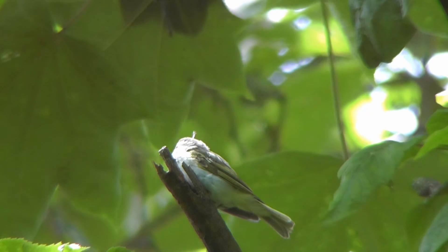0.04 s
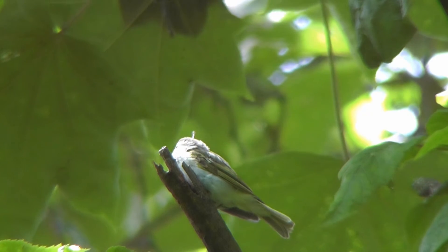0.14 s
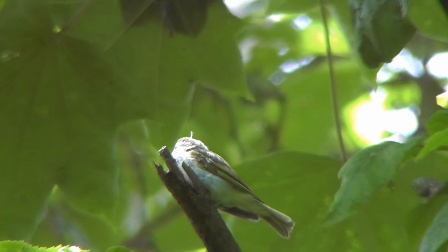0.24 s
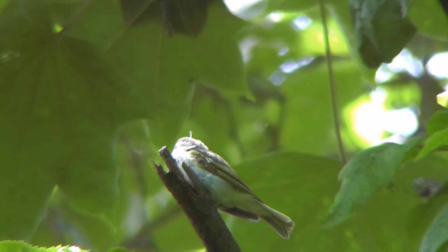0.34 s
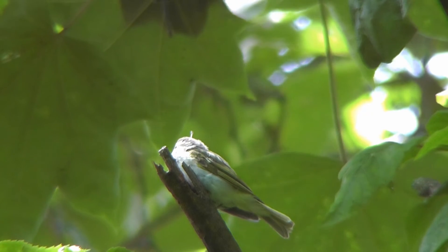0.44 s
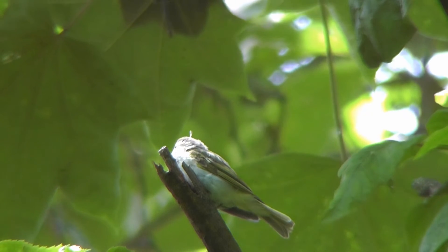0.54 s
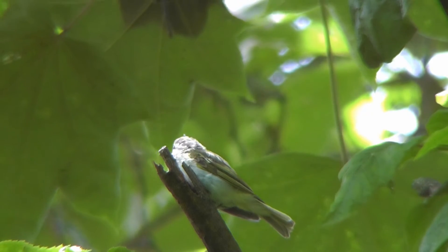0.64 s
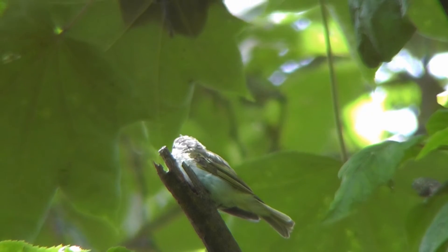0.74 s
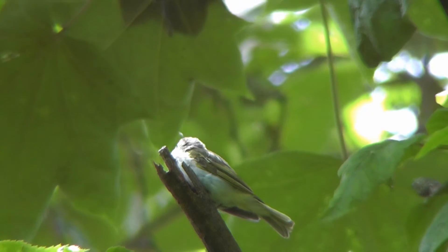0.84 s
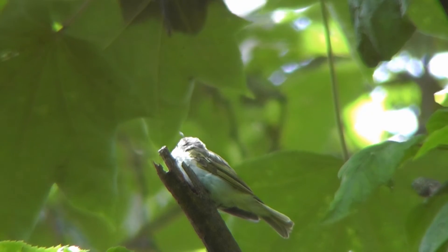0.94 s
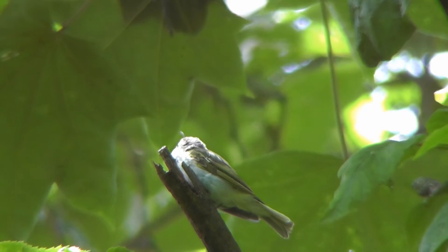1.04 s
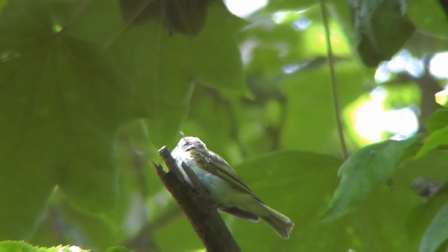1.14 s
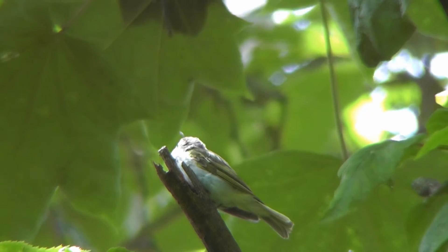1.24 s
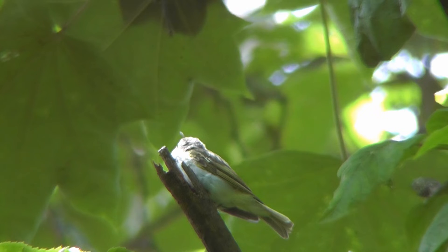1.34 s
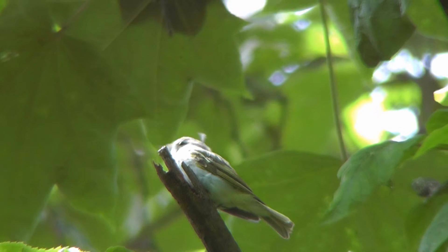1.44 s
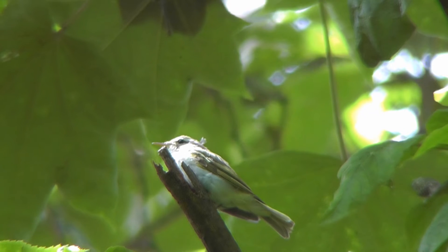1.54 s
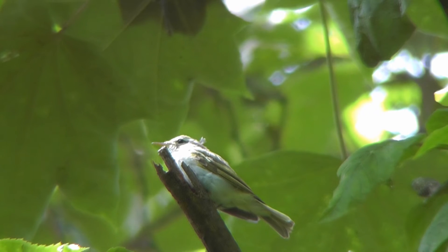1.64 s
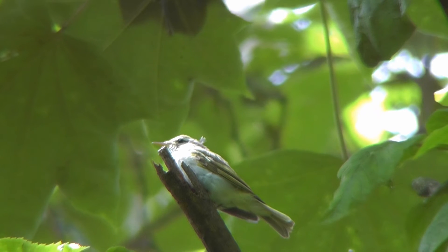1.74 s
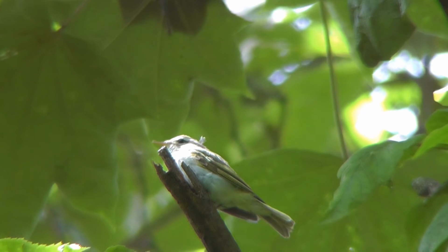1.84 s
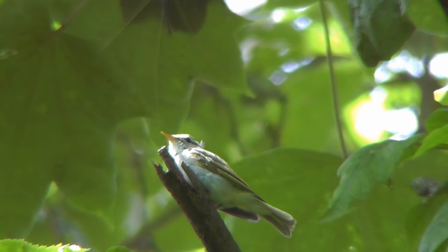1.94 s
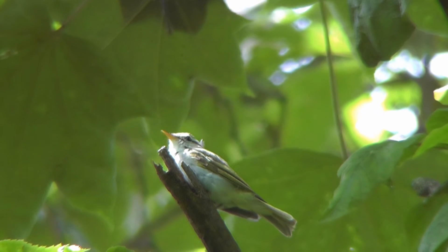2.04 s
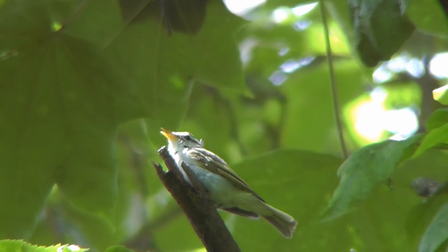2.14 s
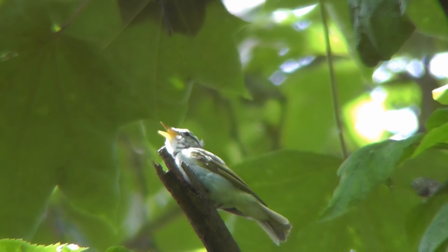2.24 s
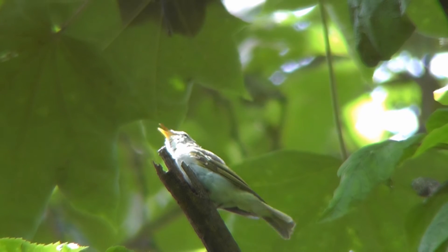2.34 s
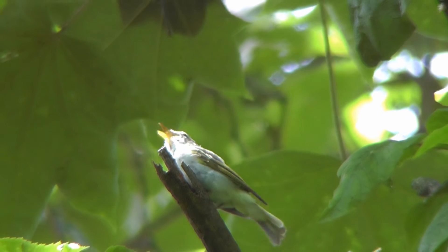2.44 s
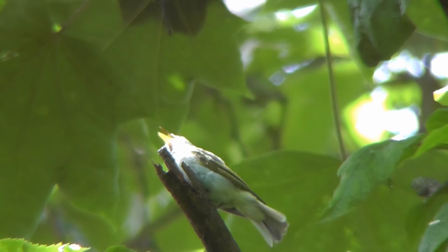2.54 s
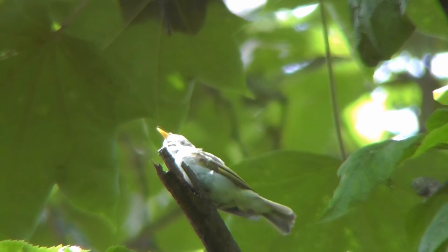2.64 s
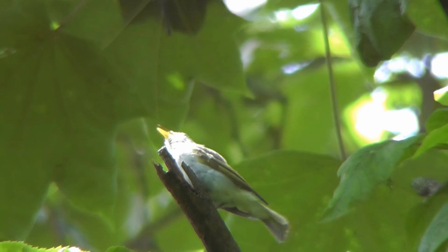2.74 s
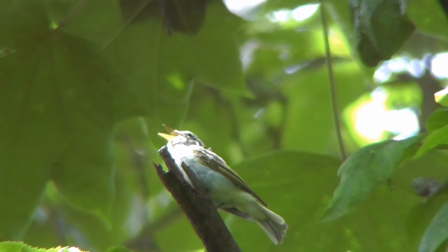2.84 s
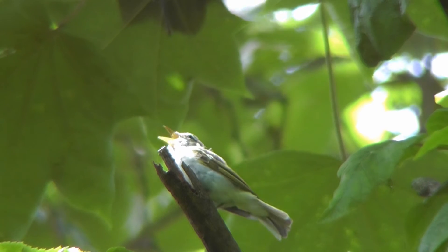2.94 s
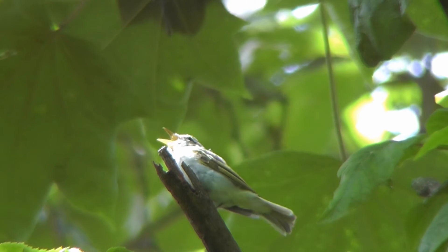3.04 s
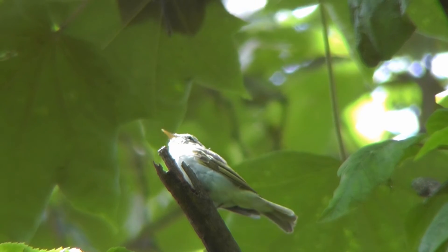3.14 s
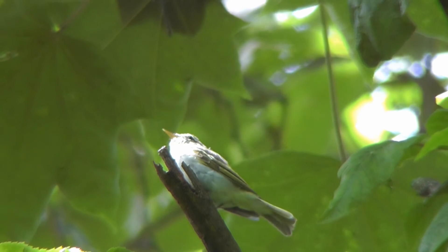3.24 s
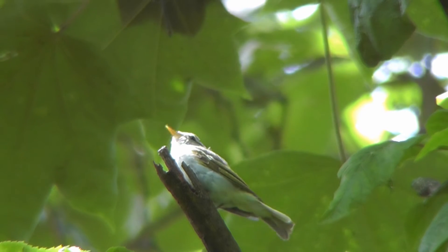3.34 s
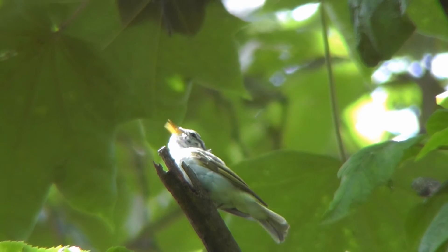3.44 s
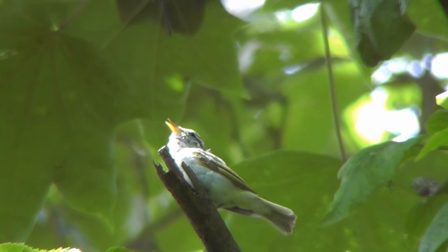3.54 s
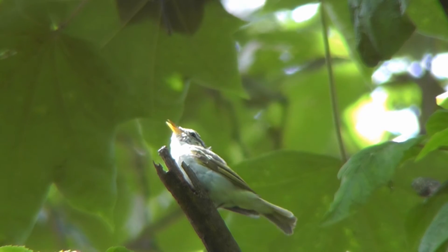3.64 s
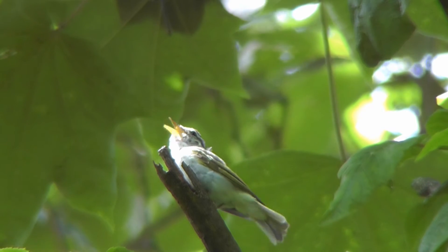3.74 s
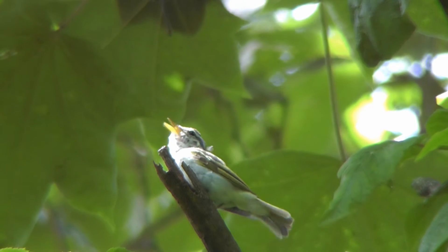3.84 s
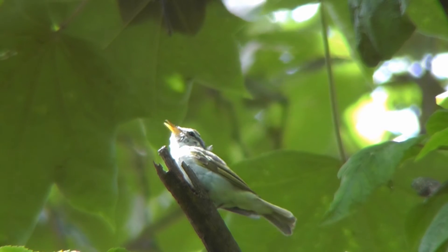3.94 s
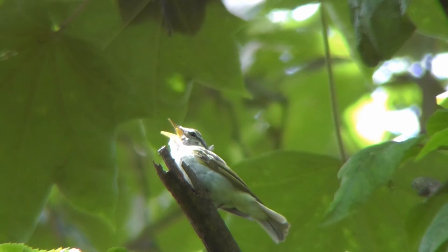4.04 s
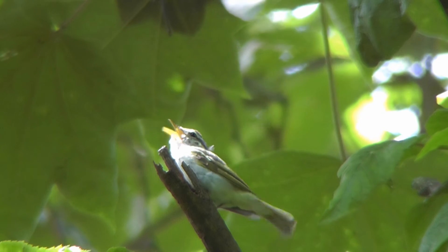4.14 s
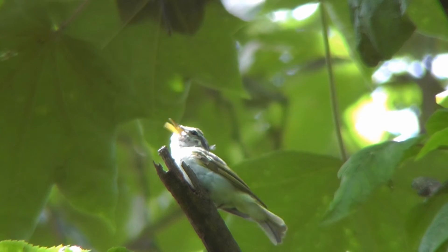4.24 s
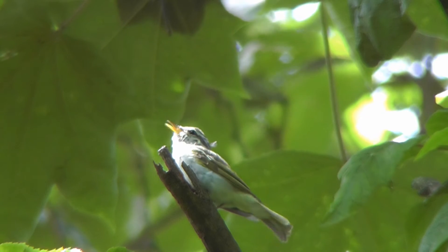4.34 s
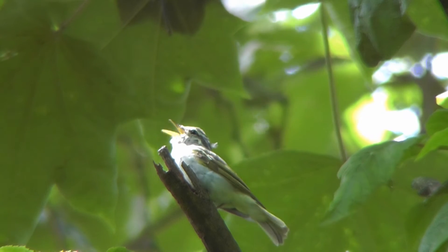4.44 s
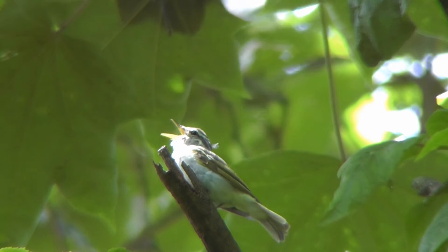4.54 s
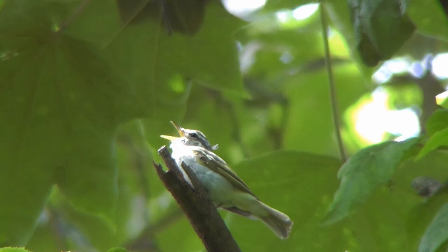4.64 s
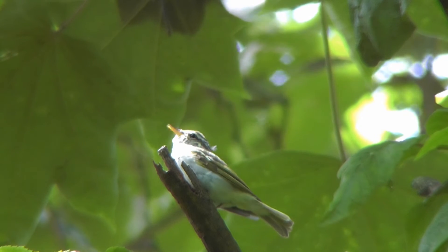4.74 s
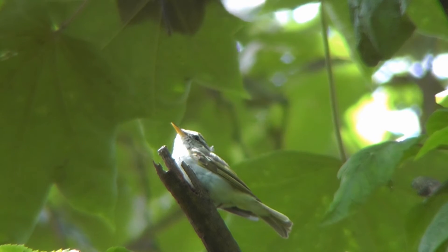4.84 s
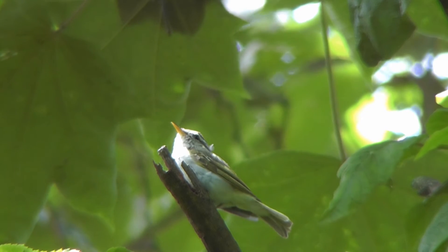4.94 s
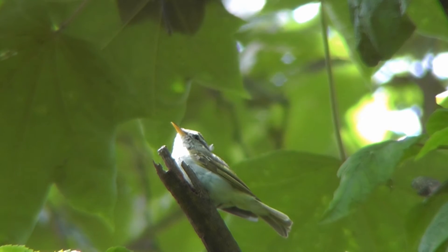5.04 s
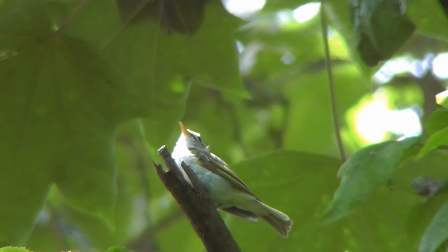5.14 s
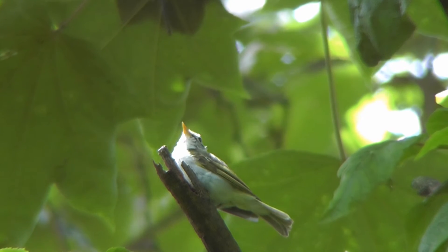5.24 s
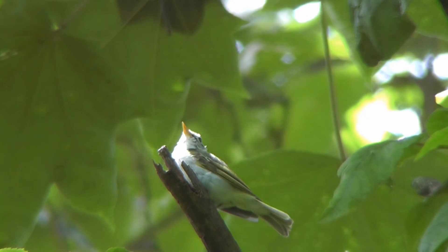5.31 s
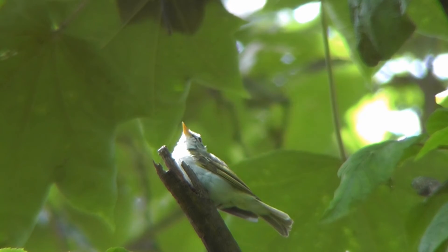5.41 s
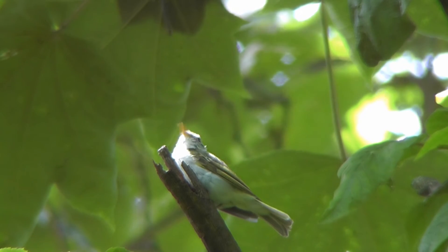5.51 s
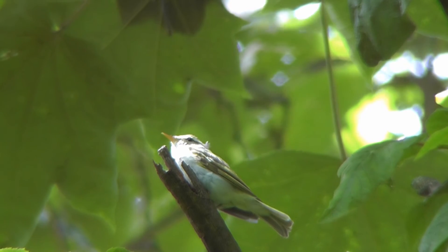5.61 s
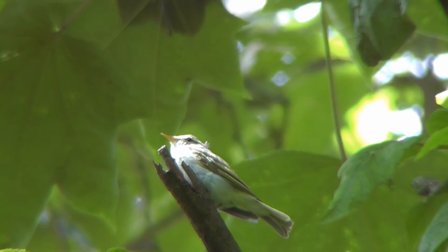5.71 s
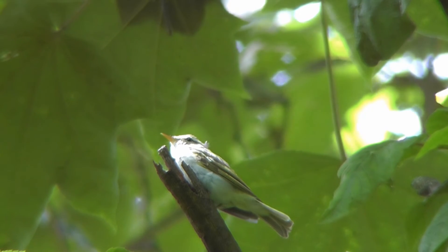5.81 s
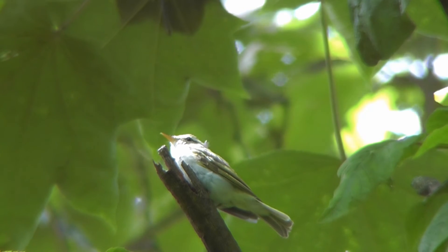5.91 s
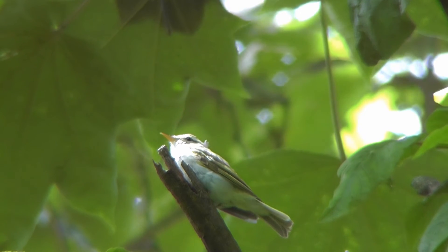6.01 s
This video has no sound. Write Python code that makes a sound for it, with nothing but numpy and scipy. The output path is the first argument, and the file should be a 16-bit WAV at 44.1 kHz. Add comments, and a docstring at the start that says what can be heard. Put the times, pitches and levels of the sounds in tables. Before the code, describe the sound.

A leafy wood, softly hissing. Tiny birds chip and glide high in the distance; four or five quick papery wing-like strokes sound close. Then one small bird dominates, nearly centred and fairly close: sharp arched whistles and a rising buzzy trill, a slight pause, more swooping whistles and a second buzz. A weak caw hides behind it. The song echoes away into hush, light leaf brushing and dry little creaking ticks.

```python
"""A leaf warbler sings from a stump in a wood: quick slurred whistles in two runs, each ending in a rising buzz.
The song is a nearly pure tone with fast-moving pitch, scattered by leaves and trunks. Deeper in the wood, small
birds give thin gliding tones and a far crow caws once in harmonics. Near the microphone, strokes of noise make
a short flutter and leaf rustles, and ringing modes make creaking ticks. Shaped noise is the hush of the trees."""
import sys
import numpy as np
from scipy import signal
from scipy.fft import rfft, irfft, next_fast_len
from scipy.io import wavfile
from scipy.ndimage import uniform_filter1d

SR = 44100
rng = np.random.default_rng(int(sys.argv[2]) if len(sys.argv) > 2 else 0)


def wav_record(signal):
    """Record a signal, one row per channel, as 16-bit PCM in the file named by sys.argv[1]."""
    frames = np.transpose(np.atleast_2d(signal))
    bounded = np.clip(frames, -1, 1)
    # unit amplitude maps onto the largest positive 16-bit level
    quanta = np.round(bounded * 32767).astype(np.int16)
    wavfile.write(sys.argv[1], SR, quanta)


N = 267687
T = np.arange(N) / SR   # time in s


def from_db(db):
    """Decibels to gain."""
    return 10 ** (np.asarray(db) / 20)


def rms_one(x):
    """Scale to unit rms."""
    return x / np.sqrt(np.mean(x ** 2) + 1e-20)


def in_time(rows, t):
    """The columns of a curve at times t."""
    s, *columns = np.transpose(rows)
    return [np.interp(t, np.sort(s), column) for column in columns]


def gain_at(spectrum, hz):
    """Gain of a spectrum on a log-frequency axis; past its ends it falls 60 dB per octave."""
    f, db = np.transpose(spectrum)
    inside = np.clip(hz, f[0], f[-1])
    octaves_outside = np.abs(np.log2((hz + 1) / inside))
    return from_db(np.interp(np.log(inside), np.log(f), db) - 60 * octaves_outside)


def noise(spectrum):
    """Random noise coloured by a spectrum, rms 1."""
    size = next_fast_len(N)
    bins_hz = np.arange(size // 2 + 1) * SR / size
    white = rfft(rng.standard_normal(size))
    return rms_one(irfft(white * gain_at(spectrum, bins_hz), size)[:N])


def drift(t, rate):
    """Random values, rate of them a second, joined by straight lines; spread near 1."""
    knots = np.arange(0, N / SR + 1, 1 / rate)
    return np.interp(t, knots, rng.standard_normal(len(knots)))


def turn(hz):
    """Running phase of an oscillator."""
    return 2 * np.pi * np.cumsum(hz) / SR


def stretch(start, length):
    """The samples of a sound and the time since its start."""
    span = (T > start) & (T < start + length)
    return span, T[span] - start


def gate(t, length, attack_s, release_s):
    """Smooth attack, hold, smooth release."""
    ramp = np.minimum(t / attack_s, (length - t) / release_s)
    return np.sin(np.pi / 2 * np.clip(ramp, 0, 1)) ** 2


def swells(rows):
    """Envelope of bell-shaped strokes: (centre_s, level_db, half_length_s)."""
    envelope = 0
    for s, db, half in rows:
        envelope = envelope + from_db(db) * np.exp(-.5 * np.minimum(((T - s) / half) ** 2, 100))
    return envelope


def wood(x, leaves_db, leaves_t60, trunks_db, trunks_t60):
    """Direct sound, a quick spray of echoes off nearby leaves, and a longer wash from the trunks."""
    t = T[:SR]
    # about 1500 leaf echoes a second, none in the first 2 ms
    sparse = rng.standard_normal(SR) * (rng.random(SR) < 1500 / SR) * (t > .002)
    leaves = sparse * from_db(-60 * t / leaves_t60)
    trunks = rng.standard_normal(SR) * (1 - np.exp(-t / .014)) * from_db(-60 * t / trunks_t60)
    echoes = (from_db(leaves_db) * rms_one(leaves) + from_db(trunks_db) * rms_one(trunks)) / np.sqrt(SR)
    return x + signal.fftconvolve(x, echoes)[:N]


def syrinx(hz, overtone_db=-44):
    """The warbler's almost pure tone; a trace of its octave gets through on the lower pitches."""
    phase = turn(hz)
    passes = 1 / (1 + (hz / 4450) ** 20)
    return np.sqrt(2) * (np.sin(phase) + from_db(overtone_db) * passes * np.sin(2 * phase))


RELEASE_S = .012   # of every whistle and buzz
WHISTLE_ATTACK_S, WHISTLE_WAVER = .022, .004   # waver as a fraction of the pitch
SWELL_DB_PER_S = 78.5   # a note grows louder up to its crest
SWEEP_LOSS_DB, FAST_SWEEP_HZ_PER_S = 4.5, 120000   # the tone weakens while the pitch moves fast
# level of a whistle by its pitch: pitch_hz, level_db
THROAT = [(2600, -14), (2850, -12), (3100, -3), (3400, -1.5), (4250, 0), (4950, -1), (5350, -2.5),
          (6100, 0), (7100, -4), (7900, -14)]


def whistle(crest_s, lead_s, out_s, db, pitch):
    """One slurred tone; pitch gives Hz by time from the crest, and level follows the pitch and its speed."""
    out = np.zeros(N)
    length = lead_s + out_s
    span, t = stretch(crest_s - lead_s, length)
    hz = uniform_filter1d(pitch(t - lead_s), size=180, mode="nearest")   # rounds the corners over 4 ms
    sweep = np.abs(np.gradient(hz)) * SR / FAST_SWEEP_HZ_PER_S
    level_db = db + SWELL_DB_PER_S * np.minimum(t - lead_s, 0) - SWEEP_LOSS_DB * sweep
    level = from_db(level_db) * gain_at(THROAT, hz) * gate(t, length, WHISTLE_ATTACK_S, RELEASE_S)
    out[span] = level * syrinx(hz * (1 + WHISTLE_WAVER * drift(t, rate=330)))
    return out


HOOK_RISE_S, HOOK_FALL_S = .016, .018   # width of the arch before and after its crest


def hook_pitch(opening_hz, crest_hz, closing_hz):
    """A round arch between two held pitches."""
    def pitch(t):
        rise = opening_hz + (crest_hz - opening_hz) * np.exp(-(t / HOOK_RISE_S) ** 2)
        fall = closing_hz + (crest_hz - closing_hz) * np.exp(-(t / HOOK_FALL_S) ** 2)
        return np.where(t < 0, rise, fall)
    return pitch


# the warbler's short arched notes, levels before the throat's colour:
# crest_s, lead_in_s, run_out_s, opening_hz, crest_hz, closing_hz, level_db
HOOKS = [(2.4544, .019, 0.046, 4040, 5054, 4233, -23), (3.001, .024, 0.043, 4520, 4965, 4000, -22),
         (3.647, 0.038, 0.042, 3110, 4407, 2740, -21.5), (3.98, 0.038, 0.045, 3080, 4404, 2668, -20.5)]


def hooks():
    """Short whistles whose pitch arches up and over."""
    return sum(whistle(s, lead, out, db, hook_pitch(*shape)) for s, lead, out, *shape, db in HOOKS)


def slur_pitch(opening_hz, crest_hz, floor_hz, climb_s, sink_s):
    """An ever steeper climb, then a fall that flattens out."""
    def pitch(t):
        climb = opening_hz + (crest_hz - opening_hz) * np.exp(-np.abs(t) / climb_s)
        sink = floor_hz + (crest_hz - floor_hz) / (1 + (t / sink_s) ** 2)
        return np.where(t < 0, climb, sink)
    return pitch


# the warbler's longer notes, climbing to a crest and sinking towards a floor, levels before the throat's colour:
# crest_s, lead_in_s, run_out_s, opening_hz, crest_hz, floor_hz, climb_s, sink_halfway_s, level_db
SLURS = [(2.505, 0.016, 0.027, 4010, 8010, 6610, 0.01, 0.011, -20.5),
         (2.7527, .087, 0.13, 5850, 6300, 3388, .0165, 0.023, -23.5),
         (3.7168, 0.046, 0.079, 3770, 5208, 3298, .029, .015, -22),
         (4.055, 0.048, 0.079, 3647, 5060, 3227, .035, .015, -21.5),
         (4.286, 0.051, 0.0854, 4967, 7100, 5194, 0.0042, 0.013, -23.5),
         (4.433, .018, 0.0846, 5550, 5570, 2404, 0.023, .04, -22.5)]


def slurs():
    """Longer whistles that climb to a crest and sink away."""
    return sum(whistle(s, lead, out, db, slur_pitch(*shape)) for s, lead, out, *shape, db in SLURS)


BUZZ_PER_S, BUZZ_UNEVENNESS = 173, .02   # swings of pitch, and the random fraction of that rate
BUZZ_CREST_HZ, BUZZ_OPENING_HZ, BUZZ_OPEN_S = 7700, 4600, .092   # the crests climb quickly, then level off
BUZZ_TROUGH_BEND = 1.3   # above 1 the troughs climb late
BUZZ_SAG_HZ = 550   # the pitch sags as the buzz dies
BUZZ_ATTACK_S, BUZZ_RELEASE_S, BUZZ_FADE_DB = .038, .1, 19
BUZZ_SWELL_DB, BUZZ_WOBBLE_DB = 6.5, 2.2   # growth in level over the length, and random unevenness
# the warbler's closing buzzes, levels before the swell and fade:
# start_s, length_s, first_trough_hz, last_trough_hz, level_db
BUZZES = [(3.02, .303, 3855, 6240, -29.6), (4.624, .314, 4000, 6640, -30.8)]


def buzzes(first_dip_db=11, last_dip_db=-1, dwell=1.3, rise_dip_db=5.7, sweep_dip_db=3):
    """The tone dwells at its trough and flicks up to a crest, too fast to follow, with uneven swings."""
    out = np.zeros(N)
    for start, length, first_hz, last_hz, db in BUZZES:
        span, t = stretch(start, length)
        along = t / length
        dying = np.maximum(1 - (length - t) / BUZZ_RELEASE_S, 0)
        trough_hz = first_hz + (last_hz - first_hz) * along ** BUZZ_TROUGH_BEND
        crest_hz = BUZZ_CREST_HZ + (BUZZ_OPENING_HZ - BUZZ_CREST_HZ) * np.exp(-t / BUZZ_OPEN_S)
        cycle = turn(BUZZ_PER_S * (1 + BUZZ_UNEVENNESS * drift(t, rate=73)))
        lift = (.5 + .5 * np.sin(cycle)) ** dwell
        hz = trough_hz + (crest_hz - trough_hz) * lift - BUZZ_SAG_HZ * dying
        # the crests start faint and fill out; the tone is weak on the way up and stronger on the way down
        crest_dip_db = first_dip_db + (last_dip_db - first_dip_db) * along
        swing_db = -crest_dip_db * (lift - .5) - rise_dip_db * np.cos(cycle) - sweep_dip_db * np.cos(cycle) ** 2
        level_db = db + BUZZ_SWELL_DB * (along - .5) - BUZZ_FADE_DB * dying
        level_db = level_db + BUZZ_WOBBLE_DB * drift(t, rate=140)
        out[span] += gate(t, length, BUZZ_ATTACK_S, RELEASE_S) * from_db(level_db + swing_db) * syrinx(hz)
    return out


# hard strokes of the flutter: centre_s, level_db, half_length_s
FLUTTER = [(1.575, -37, 0.0027), (1.626, -38, 0.0041), (1.684, -35.5, 0.0019), (1.725, -37.5, 0.0045),
           (1.761, -51, .005)]
# colour of the flutter: frequency_hz, relative level_db
FLUTTER_COLOUR = [(300, -43), (580, 5), (800, -18), (1100, -4), (1600, -6), (2200, 10), (2700, 2),
                  (3400, 2.5), (5000, -12), (5700, -17), (7600, -9.5), (10000, -34), (15000, -36)]
BRUSH_LEAD_S, BRUSH_HALF_S, BRUSH_DB = .011, .0066, -7.5   # lead and level relative to the stroke that follows


def flutter():
    """A quick run of noise strokes, a soft brush before each."""
    brushes = swells([(s - BRUSH_LEAD_S, db + BRUSH_DB, BRUSH_HALF_S) for s, db, _ in FLUTTER])
    return np.hypot(swells(FLUTTER), brushes) * noise(FLUTTER_COLOUR)


# creaking ticks close to the microphone: start_s, relative level_db
TICKS = [(5.5772, -31), (5.5944, -36.5), (5.6441, -27), (5.6534, -30), (5.6604, -27.5), (5.697, -29),
         (5.7114, -37), (5.7204, -37), (5.7369, -37), (5.7474, -42), (5.7543, -33.5)]
# ringing modes of a tick, before random spread: frequency_hz, relative level_db, t60_s
TICK_MODES = [(567, -0.5, 0.014), (1166, -3, 0.049), (1314, -7, 0.017), (2850, -11.5, 0.016),
              (3450, -17, 0.016)]


def ticks(level_db=-1.0, detune=.02, spread_db=3.0, thin_hz=850, soft_hz=4500):
    """Each slip sets the same few short modes ringing; the body is small and the contact soft."""
    out, t = np.zeros(N), T[:SR // 10]
    for s, db in TICKS:
        at = round(s * SR)
        for hz, mode_db, t60 in TICK_MODES:
            start_db = level_db + db + mode_db + spread_db * rng.normal()
            ring_hz = hz * (1 + detune * rng.normal())
            out[at:at + len(t)] += from_db(start_db - 60 * t / t60) * np.sin(2 * np.pi * ring_hz * t)
    band = signal.butter(3, [thin_hz, soft_hz], "band", fs=SR, output="sos")
    return signal.sosfilt(band, out)


# soft rustles of leaves: centre_s, level_db
RUSTLES = [(.03, -54.5), (5.24, -57), (5.315, -53.5), (5.39, -54.5), (5.46, -54.5), (5.53, -54.5),
           (5.569, -52), (5.93, -56), (6.045, -54)]
# colour of the rustles: frequency_hz, relative level_db
RUSTLE_COLOUR = [(800, -35), (2000, 4.5), (3700, 4.5), (5500, -7), (7500, -7), (10000, -43), (15000, -28.5)]


def rustles(half_length_s=.018):
    """Leaves brush softly: bell-shaped puffs of coloured noise."""
    return swells([(s, db, half_length_s) for s, db in RUSTLES]) * noise(RUSTLE_COLOUR)


def thin_call(start, length, db, pitch, waver=.009):
    """A small bird's faint slur that swells and fades; pitch gives Hz by time from its start."""
    out = np.zeros(N)
    span, t = stretch(start, length)
    swell = np.sqrt(np.abs(np.sin(np.pi * t / length)))
    hz = pitch(t) * (1 + waver * drift(t, rate=97))
    out[span] = from_db(db) * swell * np.sin(turn(hz))
    return out


SLIDE_FROM_HZ, SLIDE_TO_HZ = 8780, 7180
# long high slides deeper in the wood: start_s, length_s, level_db
SLIDES = [(0.444, 0.52, -70.5), (1.851, 0.39, -64), (4.466, .31, -58.5), (5.674, 0.54, -70)]


def slides():
    """Thin calls whose pitch falls in a straight line."""
    out = np.zeros(N)
    for s, length, db in SLIDES:
        out += thin_call(s, length, db, lambda t: SLIDE_FROM_HZ + (SLIDE_TO_HZ - SLIDE_FROM_HZ) * t / length)
    return out


# lower calls deeper in the wood: start_s, length_s, final_hz, settling_s, level_db
DROPS = [(.628, .19, 4750, .085, -68.5), (.925, 0.12, 5460, .11, -75), (1.089, 0.25, 4904, .04, -64),
         (1.776, .3, 5050, .046, -64.5), (2.326, .16, 4700, 0.12, -68), (3.514, .17, 4810, .08, -60.5),
         (4.207, 0.055, 4910, .075, -56), (5.589, .22, 4830, 0.057, -61.5)]


def drops(depth_hz=1200):
    """Thin calls whose pitch drops and levels off."""
    out = np.zeros(N)
    for s, length, hz, settle_s, db in DROPS:
        out += thin_call(s, length, db, lambda t: hz + depth_hz * np.exp(-t / settle_s))
    return out


# short chips deeper in the wood: start_s, middle pitch_hz, level_db
CHIPS = [(.404, 7920, -65), (.43, 6530, -68.5), (.91, 8080, -66), (.925, 6380, -80), (1.14, 8100, -71.5),
         (1.334, 8130, -66.5), (1.642, 7930, -66.5), (4.57, 7930, -56), (4.575, 6700, -59.5)]


def chips(length_s=.11, rise_hz=380):
    """Thin calls whose pitch rises briefly in a straight line."""
    out = np.zeros(N)
    for s, hz, db in CHIPS:
        out += thin_call(s, length_s, db, lambda t: hz + rise_hz * (t / length_s - .5))
    return out


def sounding(contour):
    """Samples that a contour covers, a fade for its two ends, and its columns with rounded corners."""
    span = (T >= contour[0][0]) & (T <= contour[-1][0])
    fade = signal.windows.tukey(span.sum(), .05)
    columns = [uniform_filter1d(c, size=220, mode="nearest") for c in in_time(contour, T[span])]
    return span, fade, columns


# one caw from a far crow: time_s, pitch_hz, level_db
CAW = [(3.54, 198.5, -70), (3.61, 194.5, -53), (3.68, 188.1, -53.5), (3.75, 183.3, -55.5), (3.82, 166, -59),
       (3.89, 157.3, -59), (3.95, 148.5, -72)]
# resonances of the crow's throat: frequency_hz, relative level_db
CROW_THROAT = [(400, -16.5), (800, -34.5), (1000, -20), (1250, -3), (1600, -10.5), (2100, -13.5),
               (2800, -18), (3600, -49)]


def crow(rough=.002, count=18):
    """A falling stack of harmonics, from the second up, shaped by the throat."""
    out = np.zeros(N)
    span, fade, (hz, db) = sounding(CAW)
    phase = turn(hz * (1 + rough * drift(T[span], rate=120)))
    harmonics = sum(gain_at(CROW_THROAT, k * hz) * np.sin(k * phase) for k in range(2, count))
    out[span] = fade * from_db(db) * rms_one(harmonics)
    return out


# colour of the hush of the wood: frequency_hz, relative level_db per Hz
HUSH = [(25, -28), (50, -24), (110, -10.5), (240, -8), (430, -3), (620, -1.5), (900, -14), (1350, -1),
        (1700, -1.5), (2050, 4), (2700, -4.5), (3450, -3.5), (4200, -13), (6000, -18)]
# level of the hush, before its random sway: time_s, level_db
HUSH_DB = [(0, -56), (1.5, -57), (2.3, -55.5), (3.1, -54.5), (4.7, -54), (5.2, -57), (6.07, -52.5)]


def hush(sway_db=.34):
    """The hush of the trees: coloured noise that slowly rises and falls, with a slight random sway."""
    return from_db(in_time(HUSH_DB, T)[0] + sway_db * drift(T, rate=16)) * noise(HUSH)


# colour of the high hiss: frequency_hz, relative level_db per Hz
HISS = [(5000, -45), (6200, -16.5), (6800, 1), (7150, -10.5), (7900, -5.5), (8600, -9.5), (9800, -21.5),
        (15500, -33), (17000, -39)]


def hiss(level_db=-69):
    """A constant high hiss of coloured noise."""
    return from_db(level_db) * noise(HISS)


# swells of a dull far rumble: centre_s, level_db, half_length_s
RUMBLES = [(.27, -67.5, 0.11), (3.6, -69.5, 0.067), (5.7, -66, 0.086)]
# colour of the rumble: frequency_hz, relative level_db per Hz
RUMBLE = [(150, -29.5), (300, -1), (400, 3), (550, -4), (900, -30)]


def rumble(floor_db=-74.5):
    """Low noise that stays at a floor and swells now and then."""
    return (from_db(floor_db) + swells(RUMBLES)) * noise(RUMBLE)


def scene(song_db=-2.17):
    """The warbler sits slightly to the right, all else central; the birds sound wetter the farther off."""
    warbler = from_db(song_db) * (hooks() + slurs() + buzzes())
    song = wood(warbler, leaves_db=.5, leaves_t60=.13, trunks_db=-6, trunks_t60=.56)
    place = from_db([[-.55], [.55]])   # left, right
    near = wood(flutter(), leaves_db=-7, leaves_t60=.23, trunks_db=-11.5, trunks_t60=.22) + ticks() + rustles()
    thin_calls = slides() + drops() + chips()
    small_birds = wood(thin_calls, leaves_db=-5.5, leaves_t60=.11, trunks_db=5, trunks_t60=.68)
    caw = wood(crow(), leaves_db=1, leaves_t60=.22, trunks_db=4, trunks_t60=1.4)
    air = hush() + hiss() + rumble()
    return song * place + near + small_birds + caw + air


# narrow dips in the recorder's response: frequency_hz, width_hz
NOTCHES = [(1795, 180), (2370, 336), (3070, 310)]


def record(dry, cutoff_hz=15750):
    """Three narrow notches colour everything; a steep low-pass cuts the top."""
    for hz, width in NOTCHES:
        dry = signal.lfilter(*signal.iirnotch(hz, hz / width, fs=SR), dry)
    return signal.sosfilt(signal.ellip(12, .1, 80, cutoff_hz, fs=SR, output="sos"), dry)


dry = scene()
out = record(dry)
wav_record(out)
```